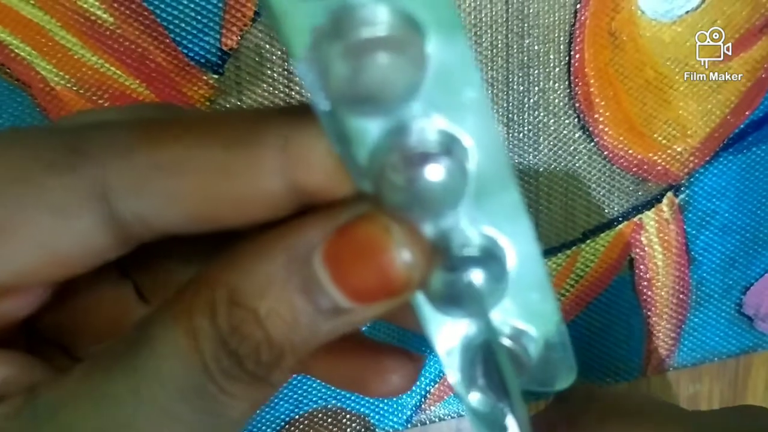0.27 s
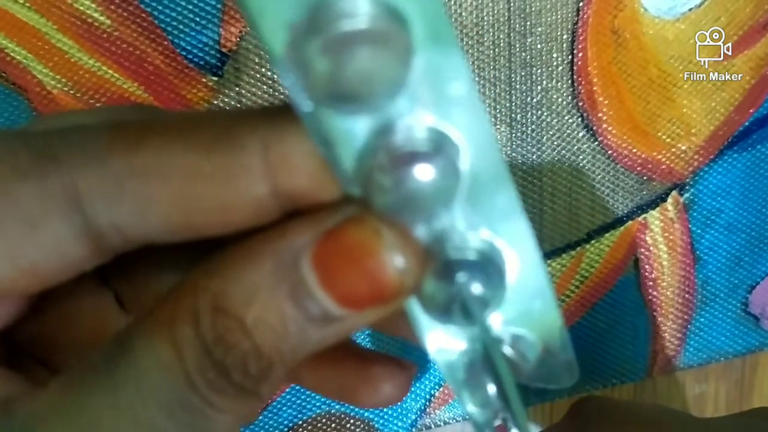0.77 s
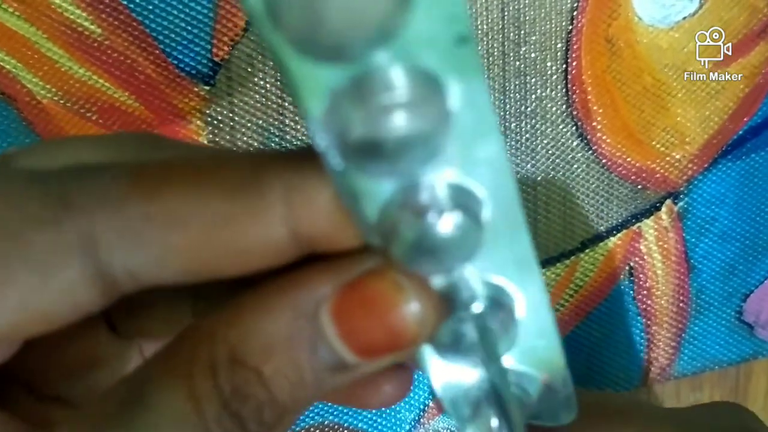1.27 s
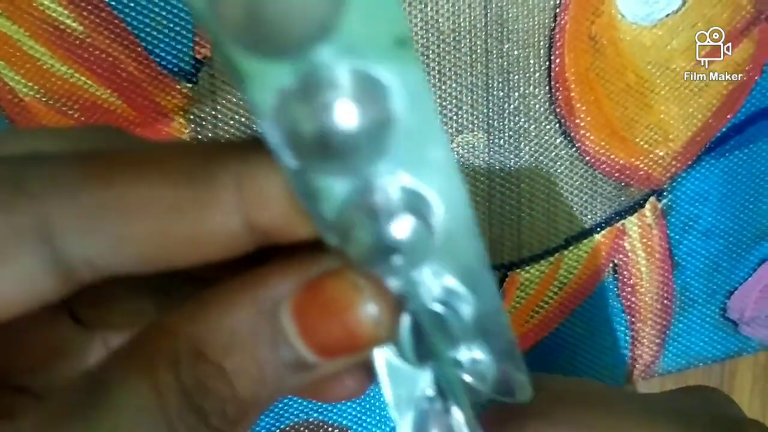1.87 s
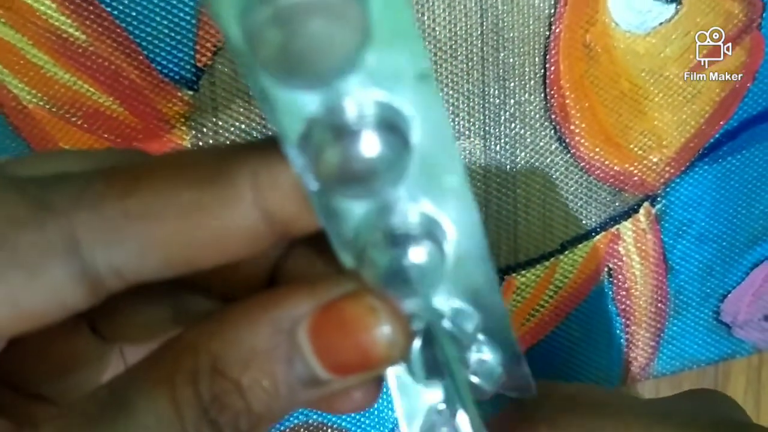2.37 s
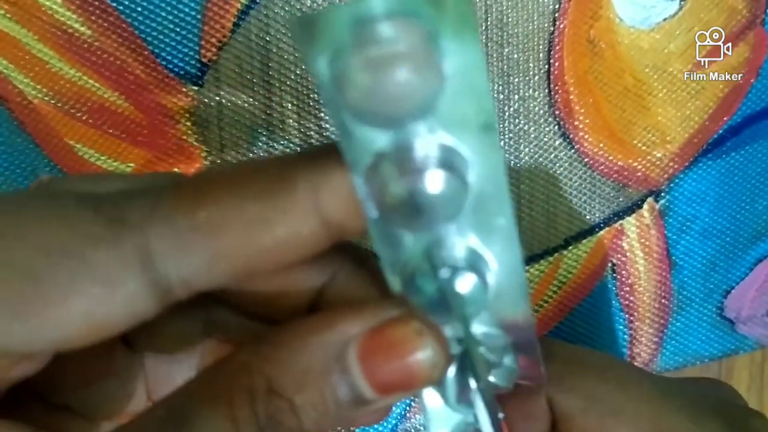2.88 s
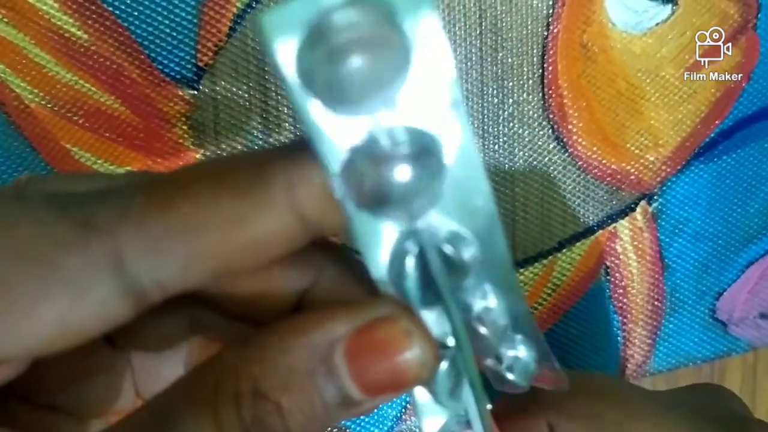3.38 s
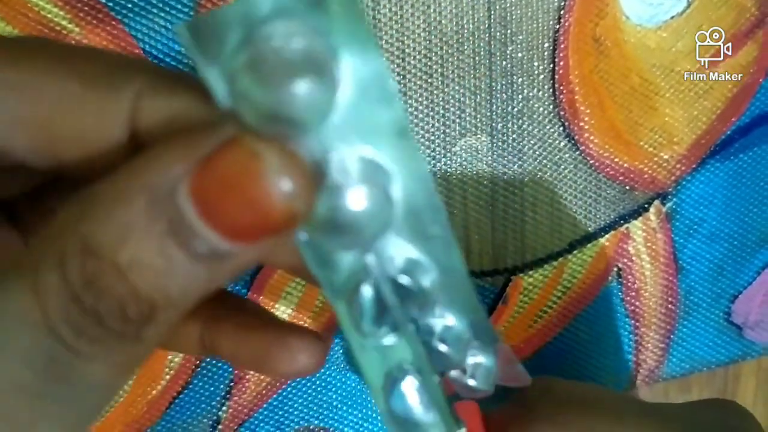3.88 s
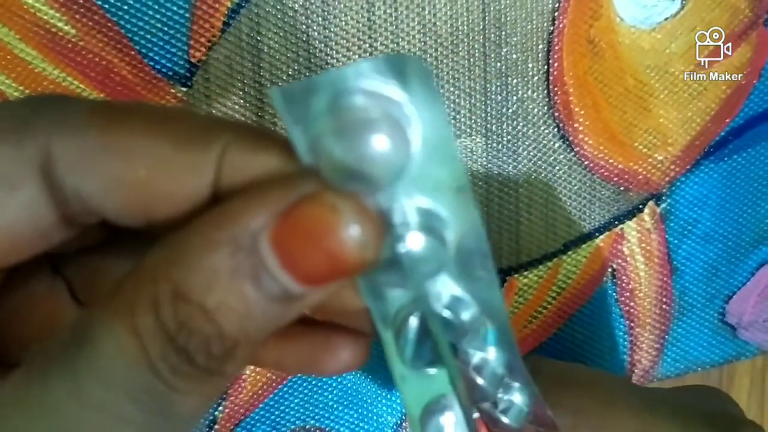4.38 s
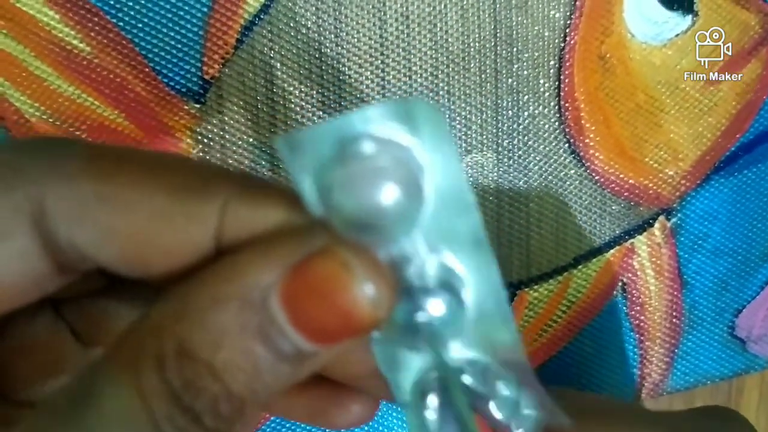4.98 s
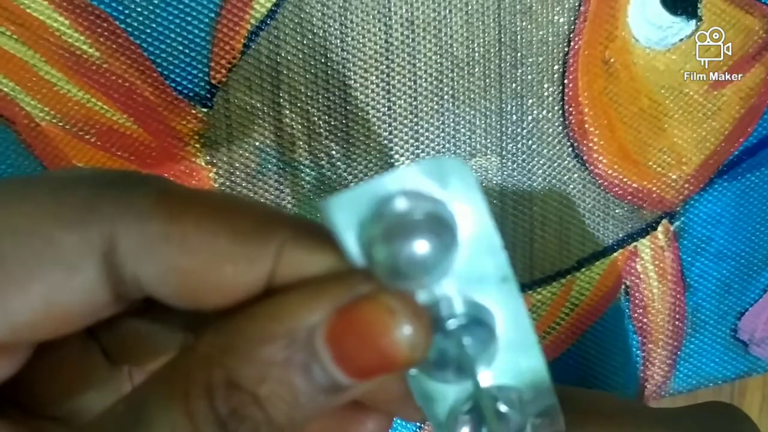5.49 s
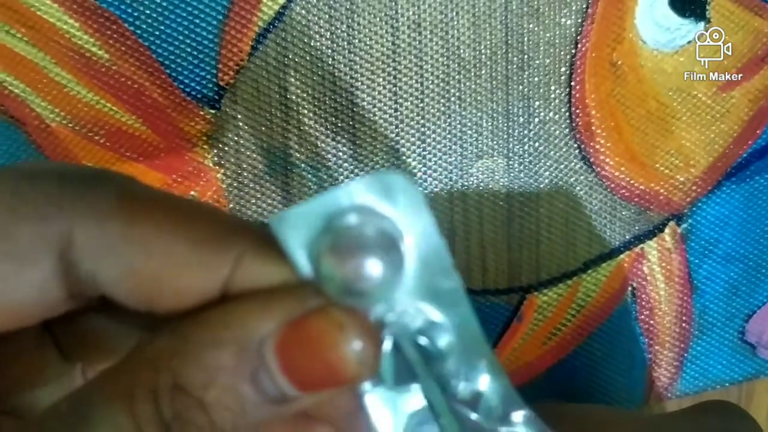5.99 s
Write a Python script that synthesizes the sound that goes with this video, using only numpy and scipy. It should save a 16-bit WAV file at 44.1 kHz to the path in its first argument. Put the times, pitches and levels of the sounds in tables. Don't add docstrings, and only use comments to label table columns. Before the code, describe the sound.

Very close, scissors work through a foil and plastic blister strip. Gritty blade scrapes lead into sharp, dry snaps and tiny metallic pings as domes buckle, with small crinkling ticks around them. Clusters come irregularly, with near-quiet gaps between. A small furnished room answers briefly. Low mains hum, rumble and hiss sit beneath; a faint insect chirps and a distant vehicle murmurs near the start. Stereo phone microphones a hand's length away, strip nearer the right.

```python
import sys
import numpy as np
from scipy import signal
from scipy.fft import rfft, irfft, next_fast_len
from scipy.io import wavfile
from scipy.ndimage import uniform_filter1d, minimum_filter1d, map_coordinates

SR = 44100
rng = np.random.default_rng(int(sys.argv[2]) if len(sys.argv) > 2 else 0)


def inscribe(sig):
    pcm = np.round(np.clip(np.atleast_2d(sig).T, -1, 1) * 32767)
    wavfile.write(sys.argv[1], SR, pcm.astype(np.int16))


def gain_from_db(level_db):
    decades = np.asarray(level_db, float) / 20
    return 10 ** decades


N = 275095


def unit(x):
    return x / np.sqrt(np.mean(x ** 2) + 1e-30)


def along(points, hz):
    f, v = np.transpose(points)
    return np.interp(np.log(hz + 1), np.log(f + 1), v)


def over_time(points):
    return np.interp(np.arange(N) / SR, *np.transpose(points))


def wobble(rate):
    knots = rng.standard_normal(int(N * rate / SR) + 4)
    return map_coordinates(knots, [np.arange(N) * rate / SR])


def filtered(x, response):
    m = next_fast_len(x.shape[-1] + 768)
    return irfft(rfft(x, m) * response(np.fft.rfftfreq(m, 1 / SR)), m)[..., :x.shape[-1]]


def modes(table):
    def response(f):
        total = 0
        for k, (centre, width, db) in enumerate(table):
            damping = 1j * f * width
            total = total + (-1) ** k * gain_from_db(db) * damping / (centre ** 2 - f ** 2 + damping)
        return total
    return response


def ports(size, shared):
    common, left, right = rng.standard_normal((3, size))
    shared = np.clip(shared, 0, 1)
    return np.sqrt(shared) * common + np.sqrt(1 - shared) * np.array([left, right])


# [t/s, peak level/dB, foil ring f/Hz, sheet flex level/dB, length/ms]
SNAPS = [(0.7494, 2.5, 11600, -16, 1.82), (0.8628, -30, 6000, -2.5, 2.3), (1.047, -33, 10000, -9.5, 3.8),
         (1.959, -37, 10270, -5, 0.39), (2.0178, -4, 10500, -33.5, 1.9), (2.0272, -2, 6700, -28, 1.5),
         (2.0418, -32.5, 10300, -5, 4.7), (2.2888, 4.5, 8670, -21.5, 1), (2.5321, -24.5, 5590, -6.5, 0.39),
         (2.5472, -11.5, 7800, -13.5, 2.2), (4.2144, -24, 10360, -19.5, 3.6), (4.2325, -35, 9680, 1.5, 2.9),
         (4.6345, -14, 9730, -12.5, 5), (4.8345, -30.5, 6860, -11.5, 4.5), (4.975, -25.5, 9600, -17, 1.5),
         (4.996, -17, 7660, -9.5, 2.04), (5.8237, -24, 8930, -8, 2.25), (6.097, -35.5, 5540, -8, 2.6)]
# [t/s, peak level/dB, foil ring f/Hz, sheet flex level/dB, length/ms]
CRUSHES = [
    (0.1059, -39, 9800, 1.5, 2.8),
    (2.0132, -11, 10970, -26, 1.1),
    (4.2565, -4.5, 10400, -14.5, 2.7),
    (4.573, -30.5, 8560, -7.5, 1.9),
    (4.9835, -23.5, 12200, -19, 2),
    (5.2754, -20, 5550, -6, 1.54),
]
# [t/s, peak level/dB, foil ring f/Hz, sheet flex level/dB, length/ms]
PINGS = [
    (0.8709, -6.5, 8280, -16.5, 2.03),
    (2.655, -11.5, 8640, -30.5, 1.43),
    (2.78, -10, 10530, -22, 1.8),
    (3.402, -24.5, 9460, -16, 3.2),
    (4.613, -15.5, 12100, -22.5, 2.2),
    (5.1653, -26, 10080, -11.5, 3.1),
    (5.3149, -9, 10230, -14.5, 1.64),
]
# [t/s, peak level/dB, foil ring f/Hz, sheet flex level/dB]
TICKS = [(0.1372, -39, 12200, -8), (0.6819, -34, 10300, -13), (0.7206, -60, 10920, -21),
         (0.8853, -30, 8590, -25), (1.2414, -36, 8900, -40), (1.428, -38.5, 9650, -15),
         (2.3035, -22.5, 9500, -25), (2.3085, -24, 12500, -39), (2.806, -34, 10630, -5),
         (4.946, -38, 9100, -9), (5.053, -44.5, 6000, -9), (5.227, -49, 8000, -8),
         (2.5004, -35.5, 11700, -14), (2.5531, -23, 7950, -11), (1.641, -41.5, 8820, -13),
         (3.102, -31, 6500, -13.5), (3.1228, -28, 10200, -17), (3.166, -35, 10000, -20),
         (1.0668, -29, 9800, -26), (1.0528, -37, 9700, -12), (1.9872, -31, 10500, -15),
         (1.965, -34, 7000, -12), (3.351, -35.5, 8600, -13), (3.6135, -45.5, 10200, -16.5),
         (4.2036, -28.5, 11770, -7.5), (4.378, -38.5, 9200, -9), (4.395, -36, 9600, -13.5),
         (4.4127, -38, 8890, -14), (4.4207, -30.5, 9300, -20), (4.426, -38, 9300, -21),
         (4.444, -35, 9000, -8), (2.6546, -18, 15200, -47), (4.884, -47, 9000, -2), (4.925, -38, 8500, -7),
         (4.955, -52, 9100, -11), (1.974, -32, 7050, -13), (4.4364, -28.5, 8800, -10),
         (4.4525, -27, 8560, -6.5), (4.477, -39, 9360, -11), (4.8153, -44, 6500, -12),
         (4.894, -45.5, 11900, 3), (4.918, -36.5, 10500, -6), (4.935, -33, 8200, -6.5),
         (5.2046, -41.5, 10400, -3), (5.242, -45, 5590, 2), (5.8072, -29, 8460, -11.5),
         (6.0563, -45.5, 5730, -34), (6.062, -46, 5840, -30), (6.113, -45, 7920, -3)]
# [t/s, peak level/dB, foil ring f/Hz]
TAPS = [(1.405, -41, 11330), (1.4628, -50.5, 5880), (1.497, -47.5, 10520), (1.839, -48, 10250),
        (1.933, -44.5, 8800), (2.4798, -39.5, 7200), (2.5597, -27.5, 11900), (2.5793, -32, 9200),
        (2.9931, -44, 5050), (3.591, -47.5, 10230), (3.6972, -51, 11140), (3.7233, -49.5, 9530),
        (3.739, -41.5, 10750), (4.5635, -35, 8800), (5.1002, -42.5, 5660), (6.069, -47, 5930)]


def contacts():
    ring_db, ping_ring_db = 7.5, 17.5
    tick_ms = tap_ms = 1.9

    def domes(rows):
        return [(s, db, hz, ring_db, flex_db - 11.5, flex_db, ms) for s, db, hz, flex_db, ms in rows]

    pings = [(s, db, hz, ping_ring_db, flex_db - 14.5, flex_db, ms) for s, db, hz, flex_db, ms in PINGS]
    ticks = [(s, db, hz, ring_db, flex_db - 13, flex_db, tick_ms) for s, db, hz, flex_db in TICKS]
    taps = [(s, db, hz, ring_db, -10.5, -5.5, tap_ms) for s, db, hz in TAPS]
    return domes(SNAPS) + pings + ticks + taps, domes(CRUSHES)


# [f/Hz, level/dB per Hz]
FOIL = [(2350, -23.5), (4000, -32.5), (4400, -11), (5070, -3.5), (6780, 4.5), (8390, 0.5), (9230, 0.5),
        (10900, 5), (15400, -4.5), (16500, -36)]
# [f/Hz, width/Hz, level/dB]
SHEET = [(1917, 900, -6), (2870, 2230, -3), (4080, 460, -1), (4318, 260, 2.5)]
# [f/Hz, width/Hz, level/dB]
DOME = [(735, 400, -3), (1050, 470, -2.5), (1460, 99, -8), (442, 700, -14.5)]


def sheet_flex(f):
    return modes(SHEET)(f) * np.clip(f / 1500, 0, 1) ** 2


def snaps(events, rise, lead):
    out = np.zeros((3, N + 1280))
    t, f = np.arange(1280) / SR, np.fft.rfftfreq(2048, 1 / SR)
    walls_ring_share = 0.72
    for s, db, ring_hz, ring_db, knock_db, flex_db, ms in events:
        u = t / (max(ms, .3) / 1000)
        burst = (1 - np.exp(-u / rise)) ** 2 * np.exp(-u ** 1.042)
        ring = 1 + modes([(ring_hz, 3200 * gain_from_db(-.35 * ring_db), ring_db)])(f)
        less_ring = np.abs(ring) ** (1 - walls_ring_share)
        foil = gain_from_db(along(FOIL, f)) * np.clip(f / 3500, 0, 1) ** 3 * ring
        dents = rng.normal(0, 1.5, 24)
        colour = gain_from_db(np.interp(f, np.linspace(0, SR / 2, len(dents)), dents))
        parts = [(foil, 1.5, .6, 1, less_ring),
                 (sheet_flex(f), flex_db, .6, 1.5, 1),
                 (modes(DOME)(f), knock_db - 0.5, .95, 4.0, 1)]
        for shape, part_db, shared, brief, wall_loss in parts:
            gain = shape * colour
            near = filtered(burst ** brief * ports(len(t), shared), lambda f: gain)
            near *= gain_from_db(db + part_db) / np.abs(near).max()
            pulse = np.roll(irfft(gain / wall_loss), 64)[:len(t)]
            pulse = unit(pulse) * np.sqrt(np.mean(near ** 2))
            start = round((s - lead * ms / 1000) * SR) + 25
            out[:, start:][:, :len(t)] += np.vstack([near, pulse])
    return out[:, :N]


# [t/s, length/s, scrape level/dB, plastic creak level/dB, sheet rustle level/dB]
SLIDES = [(.112, 0.1, -50.5, -68, -61), (.665, 0.097, -62, -73, -73), (1.228, 0.046, -57.5, -69, -67.5),
          (1.395, 0.096, -75, -74, -74), (2.435, 0.097, -53.5, -69, -67.5), (2.555, 0.1, -58, -65, -61),
          (2.98, 0.16, -68.5, -79, -75), (3.087, 0.14, -41, -60, -58.5), (4.184, 0.17, -40.5, -58.5, -57),
          (4.565, 0.16, -60, -67, -70), (5.985, 0.083, -65, -75, -79.5), (6.11, 0.19, -62, -90, -82.5)]
# [t/s, length/s, level/dB x 3]
CUTS = [
    (.858, 0.024, -40, -70, -58),
    (1.575, 0.086, -57, -63, -66),
    (1.94, 0.1, -37, -56, -56),
    (2.74, 0.059, -55.5, -67, -62),
    (4.895, 0.077, -52, -69, -68),
    (4.965, 0.045, -34, -70, -69),
    (5.04, 0.09, -60, -71, -68),
    (5.205, .1, -42.5, -59, -52.5),
    (5.79, 0.056, -53.5, -66.5, -66),
]
# [t/s, length/s, level/dB x 3]
SWELLS = [
    (1.035, 0.12, -34.5, -58.5, -61),
    (3.22, 0.26, -55.5, -69, -68),
    (3.69, 0.13, -57.5, -69, -63.5),
    (3.82, 0.23, -67, -91.5, -85),
    (4.375, 0.13, -48, -61.5, -57),
]


def pressure():
    t, out = np.arange(N) / SR, np.zeros((3, N))
    for rows, build, ease in [(SLIDES, 0.2, 0.37), (CUTS, 0.48, 0.13), (SWELLS, 0.36, 0.63)]:
        for s, length, *layers_db in rows:
            u = (t - s) / length
            push = np.clip(np.minimum(u / build, (1 - u) / ease), 0, 1) ** 2
            out += gain_from_db(np.array(layers_db)[:, None]) * push
    return out


# [f/Hz, level/dB per Hz]
SCRAPE = [(880, -50.5), (1500, -22.5), (3520, -13.5), (4260, -7.5), (4950, -13.5), (5700, -3.5),
          (6300, -6.5), (10200, -1.5), (14800, -13), (15900, -20.5), (16500, -52.5)]


def strokes():
    scrape_gain, creak_gain, rustle_gain = pressure()
    grit = gain_from_db(3.2 * wobble(1500) + 1.4 * wobble(400) + 1.1 * wobble(120))
    stick_slip = gain_from_db(4.7 * wobble(81))
    scrape = filtered(grit * ports(N, shared=0.076), lambda f: gain_from_db(along(SCRAPE, f)))
    creak = filtered(stick_slip * ports(N, shared=0.48), lambda f: modes(DOME)(f) * np.clip(f / 500, 0, 1))
    rustle = filtered(grit * ports(N, shared=0.13), sheet_flex)
    return scrape_gain * unit(scrape) + creak_gain * unit(creak) + rustle_gain * unit(rustle)


# [t/s, peak level/dB, f/Hz, t60/s]
DOME_RINGS = [(0.749, -26.5, 904, 0.015), (0.749, -22, 1500, 0.017), (0.749, -31.5, 547, 0.023),
              (0.871, -31, 1480, 0.006), (2.289, -21.5, 1580, 0.0085), (0.87, -39, 760, 0.021),
              (2.288, -22, 1230, 0.0059), (2.548, -38, 893, 0.026), (2.561, -38.5, 1045, 0.038),
              (2.58, -40, 797, 0.02), (2.779, -33.5, 1480, 0.0088), (3.746, -50.5, 1140, 0.039),
              (4.258, -20, 1010, 0.013), (4.571, -34.5, 1050, 0.014), (4.834, -57, 803, 0.051),
              (4.994, -43, 815, 0.053), (5.168, -56, 770, 0.064), (5.24, -58, 690, 0.074),
              (5.275, -53, 857, 0.19), (5.314, -41.5, 710, 0.025), (5.825, -48.5, 820, 0.031),
              (6.097, -34.5, 1050, 0.012)]
# [t/s, peak level/dB, f/Hz, t60/s]
SHEET_RINGS = [(2.289, -29, 3500, 0.016), (2.5471, -48, 4270, 0.019), (2.6548, -15, 2970, 0.0056),
               (2.655, -13, 3780, 0.0028), (2.779, -33.5, 4380, 0.029), (3.403, -36, 2390, 0.011),
               (2.0275, -18, 10600, 0.006), (2.0135, -26, 6800, .01), (2.2895, -20, 4290, .01),
               (.7497, -15.5, 7700, .012), (4.261, -18, 9400, .015), (5.277, -26, 7600, 0.0057),
               (2.779, -31.5, 1930, 0.016), (5.824, -41, 2170, 0.012), (4.2593, -16.5, 3600, 0.026),
               (4.2605, -14, 3590, 0.0095), (4.273, -23, 3900, 0.015), (4.278, -24.5, 3300, 0.015),
               (.7497, -22.5, 4300, .01), (4.259, -24, 2400, 0.014)]


def rings():
    out, t = np.zeros(N + 4096), np.arange(4096) / SR
    for s, db, hz, t60 in DOME_RINGS + SHEET_RINGS:
        swing = (1 - np.exp(-t / 0.00049)) * gain_from_db(db - 1.5 - 60 * t / max(t60, .004))
        phase = 2 * np.pi * hz * t * (1 - .4 * t) + rng.uniform(0, 2 * np.pi)
        out[round(s * SR) + 40:][:len(t)] += swing * np.sin(phase)
    return out[:N] * gain_from_db(2.2 * wobble(400))


# [t/s, peak level/dB, f/Hz]
THUMPS = [(0.402, -64, 298), (0.418, -61, 215), (1.09, -60, 400), (3.12, -62, 298), (2.555, -53.5, 45),
          (0.748, -44.5, 127), (0.873, -54.5, 256), (0.974, -59, 231), (1.055, -60, 185.5),
          (2.288, -49.5, 198), (2.289, -38, 423), (2.2901, -32.5, 657), (0.748, -52.5, 251.4),
          (2.547, -50.5, 324), (2.991, -54, 215), (4.258, -45, 364), (4.263, -49.5, 50.1),
          (4.301, -63.5, 45), (4.634, -55.5, 220)]


def thumps():
    out, t = np.zeros(N + 4096), np.arange(4096) / SR
    for s, db, hz in THUMPS:
        out[round(s * SR):][:len(t)] += gain_from_db(db + 11.0 - 60 * t * hz / 1.7) * np.sin(2 * np.pi * hz * t)
    return out[:N]


# [f/Hz, left minus right level/dB]
SHADE = [(60, -8.5), (240, -14.5), (600, -10), (1200, -8), (2800, -8.5), (5000, -11), (9000, -2.5),
         (15000, -3)]
# [t/s, left minus right level/dB]
TURN = [(0, 3.5), (.68, 6), (.8, 5), (1.5, 5.5), (1.96, 4.5), (2.03, 7.5), (2.3, 5.5), (2.55, 5.5),
        (2.66, 4), (2.78, 6), (3.1, 4), (3.4, 7.5), (4.2, 4), (4.83, 3), (4.98, 3), (5.28, 2.5), (5.8, 3),
        (6.24, 3.5)]


def at_the_ports(strip):
    halves, delay_s = np.array([[.5], [-.5]]), np.array([[.00022], [0]])

    def path(f):
        lag = f * np.clip(f / 3000, .65, 1) * delay_s
        return gain_from_db(along(SHADE, f) * halves) * np.exp(-2j * np.pi * lag)

    return filtered(strip, path) * gain_from_db(over_time(TURN) * halves)


# [f/Hz, level/dB]
WALLS = [(500, -3), (1500, 1.5), (3000, 0), (4400, 1), (5500, -4), (15000, -2.5)]
# [f/Hz, t60/s]
ROOM = [(300, .12), (900, 0.089), (2500, 0.22), (6000, 0.2), (10000, 0.22), (15000, 0.17)]


def room(pulses, steady):
    x = filtered(pulses, lambda f: gain_from_db(along(WALLS, f))) + steady
    out, step = np.zeros((2, N + SR)), SR // 7
    for a in range(0, N, step):
        hz, t, z = signal.stft(rng.standard_normal((2, SR // 4)), SR, nperseg=128)
        uneven = uniform_filter1d(rng.standard_normal(z.shape), size=4, axis=1)
        z *= gain_from_db(4.5 * uniform_filter1d(uneven, size=4, axis=2))
        decay = gain_from_db(-60 * t / along(ROOM, hz)[:, None])
        tail = signal.istft(z * decay, SR, nperseg=128)[1]
        tail *= np.clip(np.arange(tail.shape[1]) / SR / 0.017, 0, 1) ** 0.5
        wet = signal.fftconvolve(x[None, a:a + step], tail / np.linalg.norm(tail[0]), axes=1)
        out[:, a:a + wet.shape[1]] += wet
    return out[:, :N] * gain_from_db([[1.25], [-1.25]])


# [t/s, level/dB]
CHIRP = [
    (0, -84),
    (.09, -86),
    (.12, -110),
    (.31, -110),
    (.34, -79),
    (.44, -79.5),
    (.49, -80),
    (.55, -80),
    (.58, -110),
]
# [t/s, level/dB]
TRAFFIC = [
    (.36, -100),
    (.43, -83),
    (.53, -82),
    (.62, -100),
]


def outdoors():
    def noise(table):
        return unit(filtered(ports(N, shared=0.87), lambda f: modes(table)(f) ** 2))

    insect = noise([(4200, 110, 0), (8400, 200, -2)])
    vehicle = noise([(925, 4900, 0)])
    return gain_from_db(over_time(CHIRP)) * insect + gain_from_db(over_time(TRAFFIC)) * vehicle


# [f/Hz, level/dB per Hz]
FLOOR = [(15, -40.5), (25, 6), (128, -6.5), (483, -17), (902, -19), (1090, -19), (1510, -22.5), (1980, -23),
         (3060, -24), (4240, -23), (6550, -24.5), (7920, -22.5), (11600, -24), (15200, -29.5),
         (16500, -34.5)]
# [f/Hz, left-right likeness]
ALIKE = [(60, 0.19), (240, 0.54), (950, 0.068), (3770, 0), (15000, 0)]
# [f/Hz, level/dB rms]
HUM = [(100, -72.5), (200, -82), (300, -86.5), (400, -89), (700, -89.5)]


def background():
    def mid_side(f):
        angle = np.arccos(np.clip(along(ALIKE, f), -1, 1)) / 2
        return gain_from_db(along(FLOOR, f)) * [np.cos(angle), np.sin(angle)]

    mid, side = filtered(rng.standard_normal((2, N)), mid_side)
    air = gain_from_db(-66.5 + 0.54 * wobble(0.49) + 0.65 * wobble(6)) * unit(np.array([mid + side, mid - side]))
    t, hum = np.arange(N) / SR, np.zeros(N)
    for k, (hz, db) in enumerate(HUM):
        level = np.sqrt(2) * gain_from_db(db + 2.2 * wobble(9))
        hum += level * np.sin(2 * np.pi * hz * t + (.3 + .35 * k) * wobble(10) + k)
    return air + hum * gain_from_db([[.4], [-.4]])


def scene():
    quick, slow = contacts()
    *near, pulses = snaps(quick, rise=0.0077, lead=0) + snaps(slow, rise=11.0, lead=0.27)
    scrape, ring = strokes(), rings()
    strip = at_the_ports(near + scrape + thumps() + ring)
    answer = gain_from_db(-10) * room(pulses, scrape[0] + 0.4 * ring)
    return strip + answer + background() + outdoors()


def patchwork(hz, t, rows, cols):
    draws = rng.random((len(hz) // rows + 1, len(t) // cols + 1))
    return np.kron(draws, np.ones((rows, cols)))[:len(hz), :len(t)]


# [from t/s, to t/s]
SPENT = [(.842, .861), (.878, .89), (2.512, 2.53), (2.535, 2.545), (2.659, 2.682), (2.765, 2.777),
         (2.785, 2.797), (3.407, 3.42), (4.245, 4.254), (4.58, 4.611), (4.617, 4.633), (4.905, 4.97),
         (5.155, 5.162), (5.172, 5.186), (5.302, 5.311)]


def hidden_by_clicks(x, depth_db):
    hz, t, z = signal.stft(x, SR, nperseg=256)
    power = uniform_filter1d(np.abs(z) ** 2, size=5, axis=1).mean(axis=0)
    treble = power[10:].mean(axis=0)
    click = np.roll(-minimum_filter1d(-treble, size=13), 1)
    patches = patchwork(hz, t, rows=5, cols=3)
    lost = (power < click * gain_from_db(2 * depth_db)) & (patches < .5) & (hz > 900)[:, None]
    spent = np.any([(t > a) & (t < b) for a, b in SPENT], axis=0)
    weak = (power < 2.5 * treble) & (patches < .55) & (hz > 1200)[:, None]
    above_top = hz[:, None] > 13800 + 2000 * patches[0] ** 2
    lost |= spent & (weak | above_top)
    return signal.istft(z * ~lost, SR, nperseg=256)[1][:, :N]


def thinned(x, loud_db):
    hz, t, z = signal.stft(x, SR, nperseg=512)
    power = uniform_filter1d(np.abs(z) ** 2, size=9, axis=1)
    total = power[:, 20:].mean(axis=(0, 1))
    skipped = (patchwork(hz, t, rows=3, cols=11) < .09) & (total < gain_from_db(2 * loud_db))
    sudden = total > 30 * uniform_filter1d(minimum_filter1d(total, 5), 3)
    very_loud = total > gain_from_db(2 * loud_db + 30)
    quiet_top_hz = 15900 - 900 * patchwork(hz, t, rows=512, cols=8)[0] ** 2
    edge_hz = np.where(sudden | very_loud, 16600, quiet_top_hz)
    kept = (~skipped | (hz < 1800)[:, None]) & (hz[:, None] < edge_hz)
    return signal.istft(z * kept, SR, nperseg=512)[1][:, :N]


def band_limit(x):
    return signal.sosfilt(signal.butter(12, 16990, fs=SR, output="sos"), x)


def record(dry):
    x = filtered(dry, lambda f: 1 / (1 + (45 / (f + 1)) ** 8))
    x = x / (1 + np.abs(x / .8) ** 6) ** (1 / 6)
    x = hidden_by_clicks(x, depth_db=-30.5)
    x = thinned(x, loud_db=-56.5)
    return band_limit(x)


dry = scene()
out = record(dry)
inscribe(out)
```